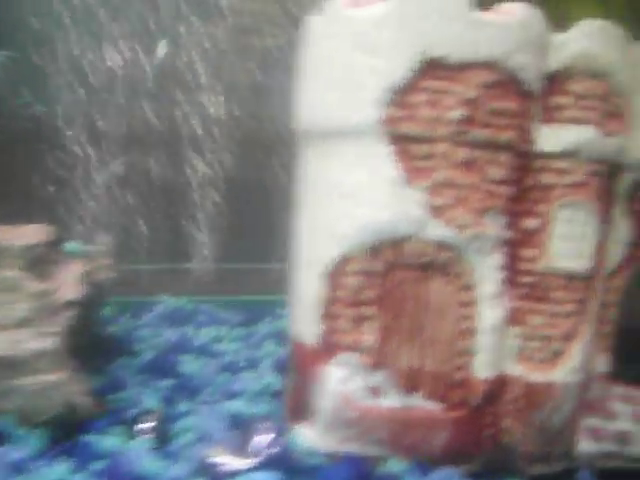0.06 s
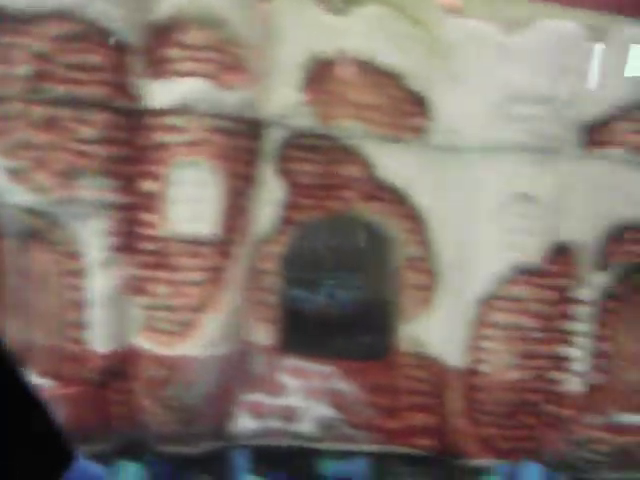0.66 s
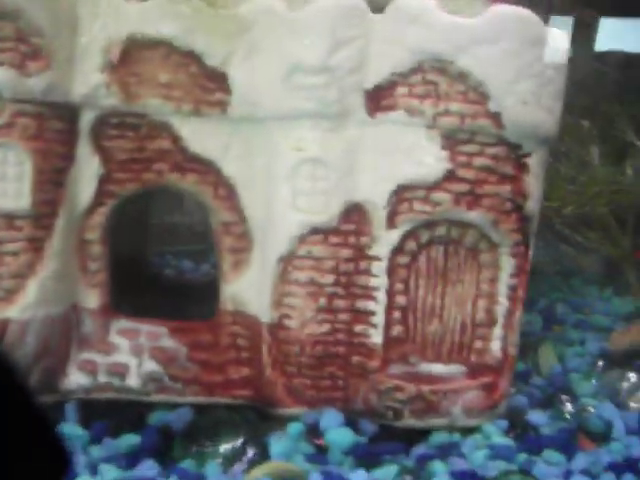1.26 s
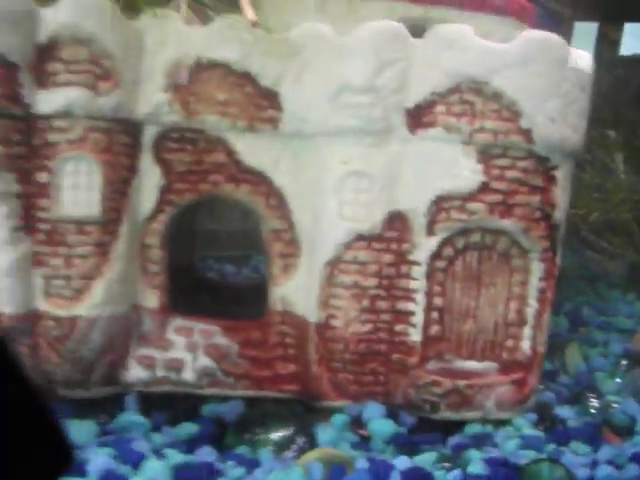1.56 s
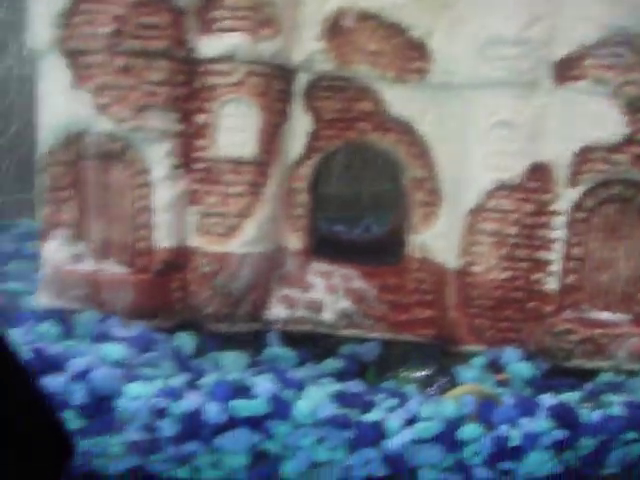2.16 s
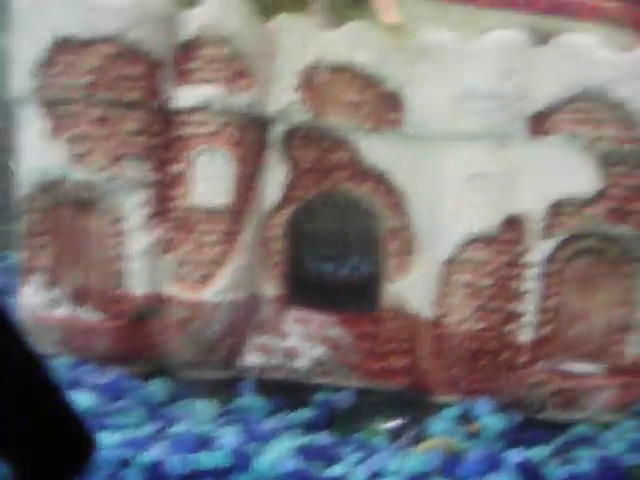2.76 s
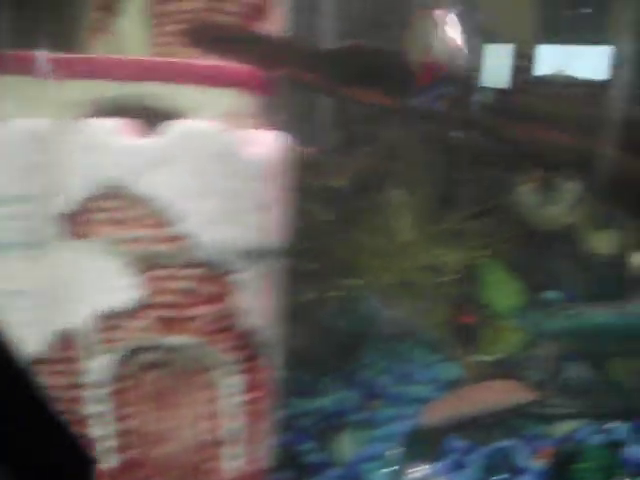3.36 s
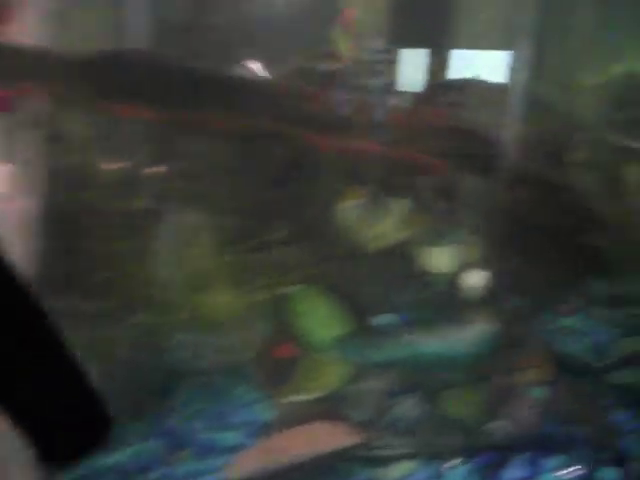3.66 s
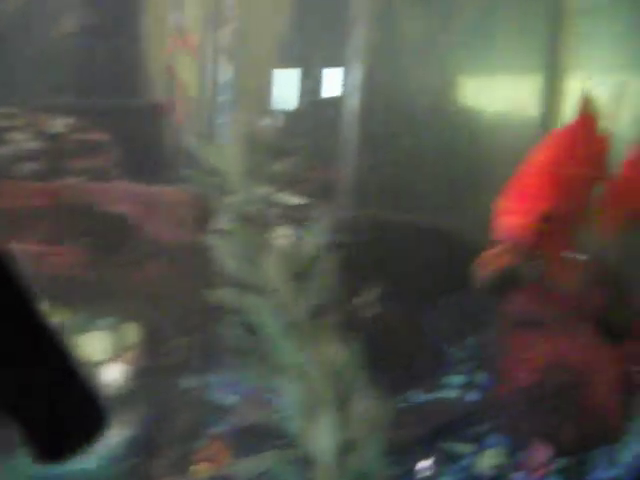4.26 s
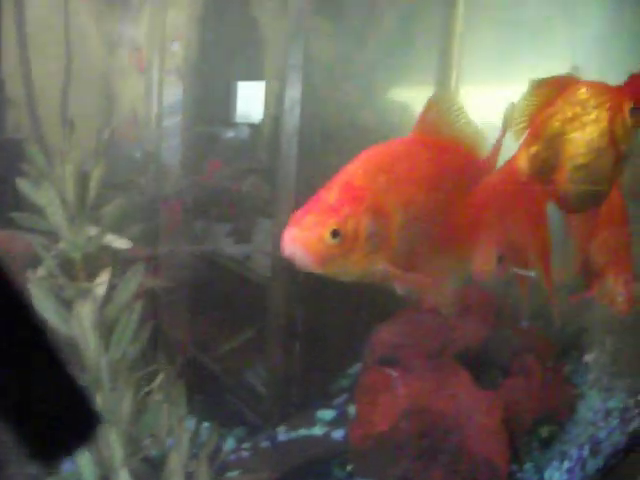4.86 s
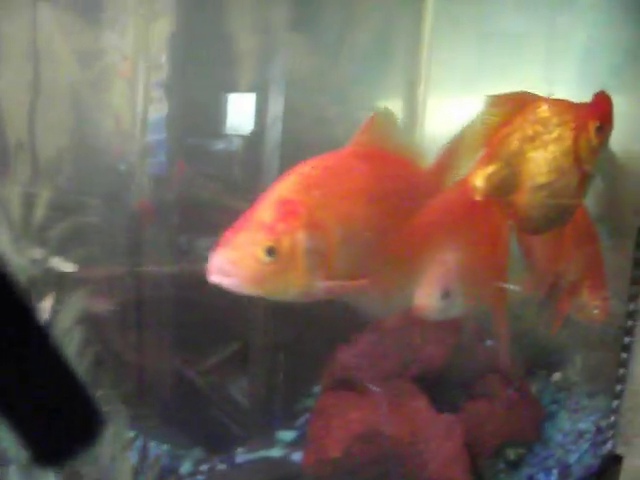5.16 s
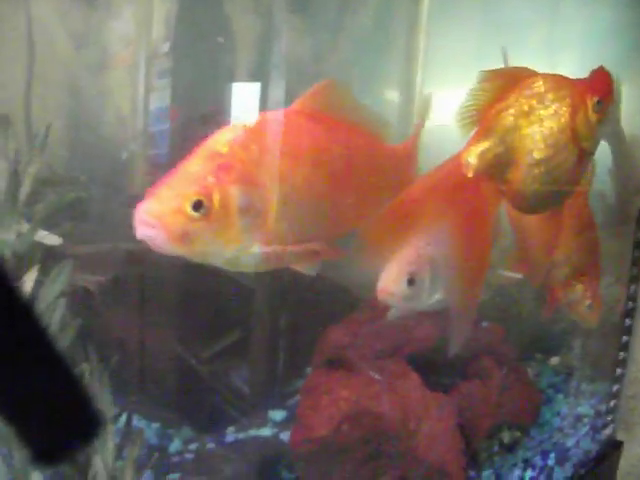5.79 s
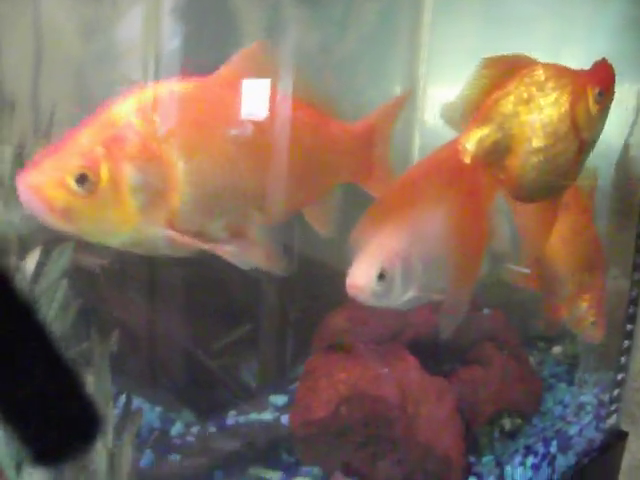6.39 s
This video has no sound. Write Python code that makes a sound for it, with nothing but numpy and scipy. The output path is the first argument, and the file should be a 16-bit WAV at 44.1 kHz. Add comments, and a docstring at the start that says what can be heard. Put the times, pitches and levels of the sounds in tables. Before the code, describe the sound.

An aquarium pump hums and bubbles fizz and plop, while camera handling adds small ticks, a knock and one sharp click.

```python
"""An aquarium in a quiet room

The air pump hums at mains pitch and a slightly slower motor beats against it. Fine bubbles fizz at
the surface; larger ones plop and gurgle, each ringing as a damped oscillator, over a low rumble.
A hand-held camera moves along the tank: friction makes its shell tick, squeak and creak, something
knocks against it, and one sharp click overloads its dull little microphone."""
import sys
import numpy as np
from scipy import signal
from scipy.fft import rfft, irfft
from scipy.io import wavfile

SR = 44100
rng = np.random.default_rng(int(sys.argv[2]) if len(sys.argv) > 2 else 0)


def dump(signal):
    """Clip the signal to [-1, 1] and save it as 16-bit WAV at the path in sys.argv[1]."""
    limited = np.clip(np.atleast_2d(signal).T, -1, 1)
    pcm = np.round(limited * 32767).astype(np.int16)
    wavfile.write(sys.argv[1], SR, pcm)


N = 283563
TIME = np.arange(N) / SR

MAINS_HZ, MOTOR_HZ, WHINE_HZ = 59.98, 57.55, 4513
# The air pump, driven by the mains. Each row: harmonic number, rms dB at the tank's left, at its right.
PUMP_HARMONICS = [(1, -40.5, -39.5), (2, -40, -51), (3, -47, -47), (4, -38, -37), (5, -48.5, -54),
                  (9, -53, -53)]
# The induction motor, slipping behind the mains. Each row: harmonic number, rms dB at left, at right.
MOTOR_HARMONICS = [(1, -45.5, -41.5), (3, -47.5, -42), (4, -55.5, -53.5), (20, -61.5, -60.5),
                   (23, -59.5, -63)]
# A faint whine. Each row: harmonic number, rms dB at left, at right.
WHINE_HARMONICS = [(1, -73.5, -65.5)]

# The colour of the bursting bubbles. Each row: frequency in Hz, relative gain in dB.
FIZZ_SPECTRUM = [(400, -21.5), (700, -15), (1150, -8), (1750, -9.5), (2100, -5), (2400, -5.5), (2720, -3.5),
                 (3130, -2.5), (3480, -6), (3750, -10), (4400, -12.5), (5000, -14), (6000, -20.5)]
# The tank's hollows. Each row: frequency in Hz, bandwidth in Hz, gain in dB at left, at right.
TANK_MODES = [(1450, 60, -2, -1), (2598, 90, 7, 11), (2825, 55, 1, 2), (3010, 130, 0, -6),
              (4120, 140, -8, -3), (4720, 110, -2, -2)]
# The clearest large bubbles. Each row: start in seconds, initial pitch in Hz, gain in dB.
LARGE_BUBBLES = [(1.212, 996, -30.5), (1.472, 816, -28), (1.988, 722, -30), (2.95, 330, -28),
                 (3.085, 926, -29), (3.9, 404, -30), (5.5, 390, -30), (5.94, 316, -27.5)]
# Fainter ones come at random, deeper towards the right end of the tank.
PLOPS_PER_S, PLOP_DB, PLOP_LEFT_HZ, PLOP_RIGHT_HZ = 2.5, -34, 749, 330

# The camera's shell. Each row: frequency in Hz, bandwidth in Hz, relative gain in dB.
SHELL_MODES = [(1444, 360, -6), (2430, 790, -1), (2875, 305, 6.5), (3220, 450, -6.5), (4706, 370, -7)]
# Its clearest ticks. Each row: start in seconds, peak in dB, decay in seconds.
SHELL_TICKS = [(0.0326, -18.5, 0.0034), (0.760, -25.5, 0.0044), (0.957, -23, 0.0051), (1.031, -23, 0.0038),
               (1.045, -21.5, 0.003), (1.104, -25, .0056), (1.206, -25.5, .004), (2.112, -25.5, 0.0033),
               (2.207, -26, .0036), (2.411, -23, .0045), (2.587, -22, .0046), (2.881, -23, .0049),
               (2.980, -21, 0.0044), (3.159, -20.5, 0.0044), (3.310, -24, .0042), (3.340, -22, 0.0078),
               (3.391, -24, .0034), (6.366, -25, .003)]
# Shifts of the grip. Each row: start and end in seconds, crackle peak in dB, typical decay in seconds.
GRIP_SHIFTS = [(0.749, 1.36, -28.5, 0.0048), (2.298, 2.6, -26, 0.0041), (3.153, 3.3, -25, 0.0054),
               (3.7, 3.8, -25, 0.0065), (4.27, 4.38, -27, .007)]
# Squeaks of the grip. Each row: start in seconds, peak in dB, decay in seconds.
GRIP_SQUEAKS = [(0.055, -19, 0.022), (0.0857, -20, 0.003)]
# The resonances of a squeak. Each row: frequency in Hz, bandwidth in Hz, relative gain in dB.
SQUEAK_MODES = [(2260, 370, 6), (2430, 340, -1), (1930, 450, -14)]
# Dull knocks, the loudest with a bounce. Each row: start in seconds, peak in dB, decay in seconds.
DULL_KNOCKS = [(0.0344, -21.5, .002), (2.2742, -11, 0.0037), (2.282, -14.5, 0.018), (5.3718, -27, .001)]
# The resonances of a knock. Each row: frequency in Hz, bandwidth in Hz, relative gain in dB.
KNOCK_MODES = [(248, 110, 6), (720, 280, 0), (1130, 230, 4.5), (1700, 450, 4.5), (2503, 250, 8),
               (3180, 600, -1), (3820, 240, -25)]
# The sharp click. Each row: frequency in Hz, amplitude in dB.
CLICK_PARTIALS = [(1530, -10.5), (2920, -2), (3650, -10.5), (4700, -20.5)]

# The colour of the room and the churning water. Each row: frequency in Hz, relative gain in dB.
RUMBLE_SPECTRUM = [(4, -25), (18, 8), (33, 4), (44, -5.5), (64, 8.5), (78, 11), (92, 3), (128, -2),
                   (170, 1), (215, -5), (325, -1.5), (410, -11), (510, -8), (800, -17), (2000, -39)]
# The rumble, highest as the camera swings across. Each row: time in seconds, rms level in dB.
RUMBLE_ENVELOPE = [(0, -32), (2.7, -31.6), (3.9, -30), (4.7, -32.5), (6.43, -32)]
# The microphone's path along the tank. Each row: time in seconds, place from 0 (left) to 1 (right).
MIC_PATH = [(0, 0), (2.2, .1), (3.3, 0.17), (4.4, 0.96), (6.43, 0.51)]


def hum(hz, harmonics):
    """Standing waves: each harmonic of a steady drive has a level that depends on place in the room."""
    total = np.zeros(N)
    for order, left_db, right_db in harmonics:
        turns = order * hz * TIME + rng.random()
        total += np.sqrt(2) * along_tank(left_db, right_db) * np.sin(2 * np.pi * turns)
    return total


def fizz(wash_db):
    """Cavity resonance: the tank's hollows colour small bubbles and the wash of their echoes; rms 1."""
    grains = bubbling(low_hz=585, high_hz=5664, per_s=5000, size_db=2, q=11.6)
    hiss = colour(grains + from_db(wash_db) * rng.standard_normal(N), FIZZ_SPECTRUM)
    hollows = sum(along_tank(left_db, right_db) * resonate(hiss, hz, width)
                  for hz, width, left_db, right_db in TANK_MODES)
    return unit_rms(hiss + hollows)


def plops(decay_cycles, rise_per_s, swell_s, wobble, pitch_spread):
    """Bubble resonance: a large bubble rings, wobbles in shape and rises in pitch near the surface."""
    out, t, shapes = np.zeros(N), TIME[:SR // 5], drift(55)
    faint = []
    for s, chance in loose_run(0, TIME[-1], PLOPS_PER_S):
        typical_hz = PLOP_LEFT_HZ * (PLOP_RIGHT_HZ / PLOP_LEFT_HZ) ** place(s)
        faint.append((s, typical_hz * np.exp(pitch_spread * chance), PLOP_DB))
    for s, hz, db in LARGE_BUBBLES + faint:
        shape = np.roll(shapes, -int(s * SR))[:len(t)]
        turns = np.cumsum(hz * (1 + rise_per_s * t + wobble * shape)) / SR
        envelope = (1 - np.exp(-t / swell_s)) * np.exp(-t * hz / decay_cycles)
        add(out, s, from_db(db) * envelope * np.sin(2 * np.pi * turns))
    return out


def bubbling(low_hz, high_hz, per_s, size_db, q):
    """A Poisson process: bubbles of random size burst and ring with quality factor q; rms 1."""
    sizes = from_db(size_db * np.minimum(rng.exponential(1, N), 4)) * rng.choice([-1, 1], N)
    bursts = sizes * (rng.random(N) < per_s / SR)
    pitches = np.geomspace(low_hz, high_hz, 20)
    pitch_index = rng.integers(0, len(pitches), N)
    return unit_rms(sum(resonate(bursts * (pitch_index == k) + 1e-18, hz, hz / q) / np.sqrt(hz)
                        for k, hz in enumerate(pitches)))


def click(start_s, length_s, tail_db):
    """Impulsive excitation: plastic snaps beside the microphone, then the shell rings faintly."""
    out, t = np.zeros(N), TIME[:int(length_s * SR)]
    partials = sum(from_db(db) * np.sin(2 * np.pi * hz * t) for hz, db in CLICK_PARTIALS)
    add(out, start_s, signal.windows.tukey(len(t), .25) * partials)
    add(out, start_s + length_s, from_db(tail_db) * contact(SHELL_MODES, decay_s=.005, rise_s=.0003))
    return out


def handling():
    """Structure-borne sound: the shell carries squeaks, knocks, ticks and creaks to the microphone."""
    out = np.zeros(N)
    for s, db, decay_s in GRIP_SQUEAKS:
        add(out, s, from_db(db) * contact(SQUEAK_MODES, decay_s, rise_s=.00034))
    for s, db, decay_s in DULL_KNOCKS:
        add(out, s, from_db(db) * contact(KNOCK_MODES, decay_s, rise_s=.00033))
    for s, db, decay_s in SHELL_TICKS + creak() + crackles():
        add(out, s, from_db(db) * tick(decay_s))
    return out


def tick(decay_s, even_decay_s=.0047):
    """Duration and bandwidth are reciprocal: the shorter a slip of the shell, the brighter; peak 1."""
    halvings = np.log2(even_decay_s / decay_s)
    tilt = np.clip(13.5 * halvings, -10, 10)
    return contact(SHELL_MODES, decay_s, rise_s=decay_s, db_per_octave=tilt, softness=2.3)


def creak(start_s=3.482, peak_db=-17.5, fade_db=8.5, per_s=55, decay_s=.00624):
    """Stick-slip friction: strained plastic yields in a run of ticks that swells, holds and fades."""
    corners = start_s + np.cumsum([0, .02, .04, .05])   # attack, hold and release in seconds
    return [(s, peak_db - fade_db * np.interp(s, corners, [1, 0, 0, 1]), decay_s)
            for s, _ in loose_run(start_s, corners[-1], per_s)]


def crackles(per_s=10, length_spread=.39):
    """Intermittent friction: a shifting grip sets off faint ticks of varying length."""
    return [(s, db, decay_s * np.exp(length_spread * chance))
            for start, end, db, decay_s in GRIP_SHIFTS for s, chance in loose_run(start, end, per_s)]


def contact(modes, decay_s, rise_s, db_per_octave=0, softness=1):
    """Modal superposition: a burst of tiny slips rings a body's steep-sided modes; peak 1."""
    t = TIME[:SR // 8]
    slips = rng.standard_normal(len(t)) * np.exp(-t / decay_s) * (1 - np.exp(-t / rise_s)) ** softness
    body, first_hz = 0, modes[0][0]
    for hz, width, db in modes:
        ringing = resonate(resonate(slips, hz, width), hz, width)
        body = body + from_db(db + db_per_octave * np.log2(hz / first_hz)) * ringing
    return body / np.abs(body).max()


def rumble():
    """Random pressure fluctuations: the room and the churning water make a low, broad noise."""
    level_db = np.interp(TIME, *np.transpose(RUMBLE_ENVELOPE))
    return from_db(level_db) * unit_rms(colour(rng.standard_normal(N), RUMBLE_SPECTRUM))


def place(s):
    """Piecewise uniform motion: the microphone's place at time s, from 0 (left) to 1 (right)."""
    return np.interp(s, *np.transpose(MIC_PATH))


def along_tank(left_db, right_db):
    """An uneven sound field: the gain follows the microphone between the ends of the tank."""
    return from_db(left_db + (right_db - left_db) * place(TIME))


def loose_run(start, end, per_s, count=48):
    """Jittered timing. Each row: time in seconds, a standard normal deviate."""
    times = start + (np.arange(count) + rng.random(count)) / per_s
    return np.column_stack([times, rng.standard_normal(count)])[times < end]


def drift(corner_hz):
    """Low-pass noise: a slow random fluctuation; rms 1."""
    rolloff = 1 + (np.fft.rfftfreq(N, 1 / SR) / corner_hz) ** 2
    return unit_rms(irfft(rfft(rng.standard_normal(N)) / rolloff, N))


def colour(x, spectrum):
    """Spectral shaping by a curve through points of frequency in Hz and gain in dB."""
    hz, db = np.transpose(spectrum)
    gain_db = np.interp(np.log(np.fft.rfftfreq(N, 1 / SR) + 1), np.log(hz), db)
    return irfft(rfft(x) * from_db(gain_db), N)


def resonate(x, hz, width):
    """A damped oscillator driven by x, with its bandwidth in Hz and a gain of 1 at resonance."""
    r = np.exp(-np.pi * width / SR)
    feedback = [1, -2 * r * np.cos(2 * np.pi * hz / SR), r * r]
    return signal.lfilter(np.array([1, 0, -1]) * (1 - r * r) / 2, feedback, x)


def add(out, s, sound):
    """Superpose a short sound at time s."""
    start = int(s * SR)
    out[start:start + len(sound)] += sound[:N - start]


def from_db(db):
    """Decibels to amplitude ratio."""
    return 10 ** (np.asarray(db) / 20)


def unit_rms(x):
    """Normalise to an rms of 1."""
    return x / np.sqrt(np.mean(x ** 2) + 1e-20)


def scene():
    """Linear superposition: motors, water and handling noises add at one microphone."""
    # The motor runs a few Hz behind the pump, so the two beat slowly.
    motors = hum(MAINS_HZ, PUMP_HARMONICS) + hum(MOTOR_HZ, MOTOR_HARMONICS)
    whine = hum(WHINE_HZ, WHINE_HARMONICS)
    room = rumble()
    surface = along_tank(left_db=-37, right_db=-38.5) * fizz(wash_db=2)
    # Middle-sized bubbles are fewer and ring longer than the fizz.
    gurgle = from_db(-49) * bubbling(low_hz=286, high_hz=1203, per_s=110, size_db=-1, q=37)
    bubbles = plops(decay_cycles=14.2, rise_per_s=.67, swell_s=.006, wobble=.05, pitch_spread=.12)
    snap = click(start_s=3.5526, length_s=.0023, tail_db=-16)
    return (motors + whine + surface + gurgle + bubbles + snap + handling() + room)[None]


def record(dry, treble_hz=5250, overload=.71):
    """Band limiting and saturation: a small microphone loses the treble and flattens strong peaks."""
    dull = signal.sosfilt(signal.butter(12, treble_hz, fs=SR, output="sos"), dry)
    dull = signal.sosfilt(signal.ellip(10, .1, 80, 6050, fs=SR, output="sos"), dull)
    flattened = np.clip(dull, -overload, overload)
    # The overtones of the overload end at 16.4 kHz.
    return signal.sosfiltfilt(signal.ellip(10, .05, 60, 16400, fs=SR, output="sos"), flattened)


dry = scene()
out = record(dry)
dump(out)
```